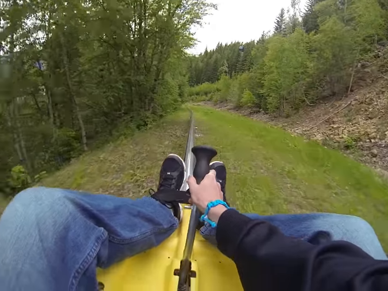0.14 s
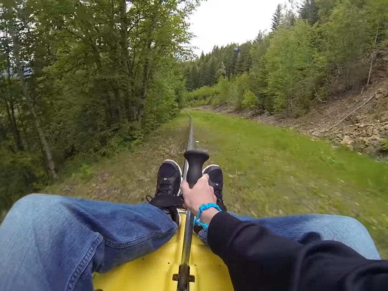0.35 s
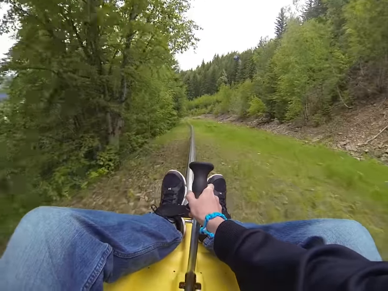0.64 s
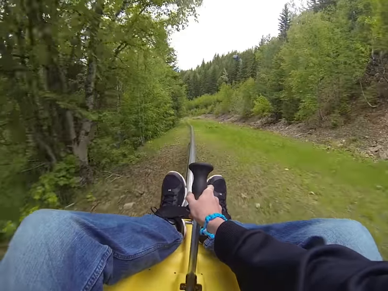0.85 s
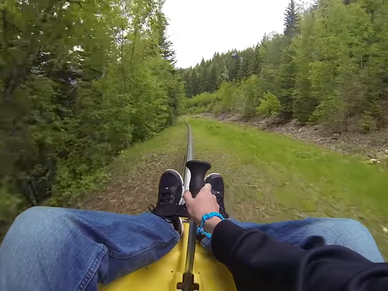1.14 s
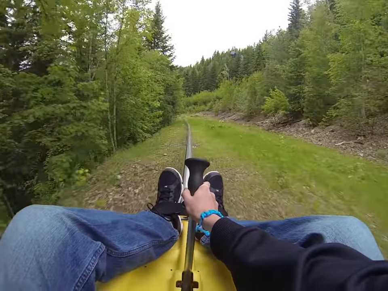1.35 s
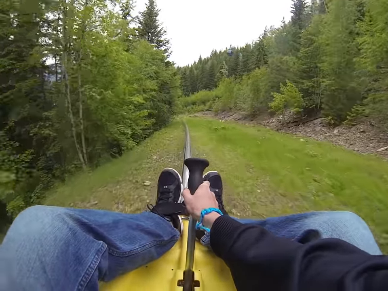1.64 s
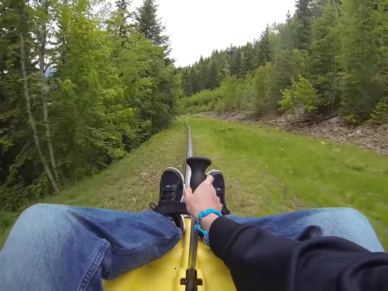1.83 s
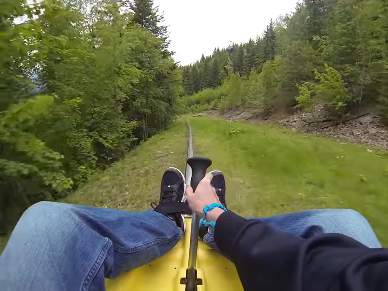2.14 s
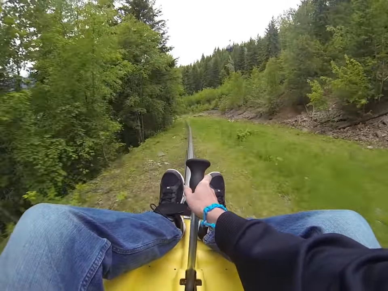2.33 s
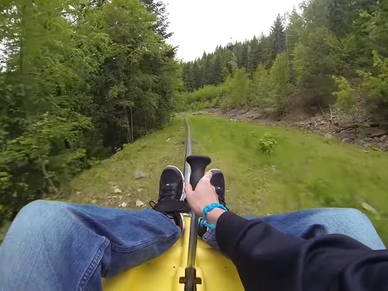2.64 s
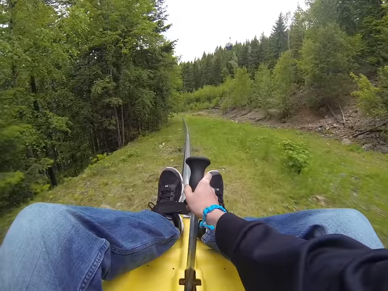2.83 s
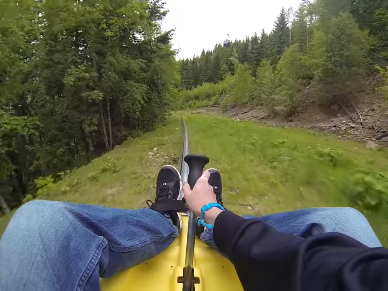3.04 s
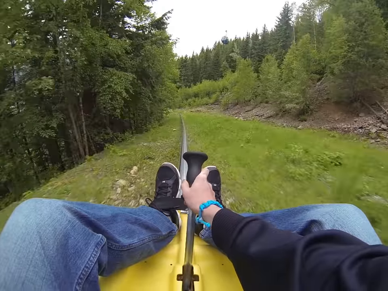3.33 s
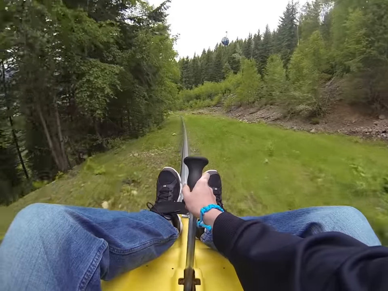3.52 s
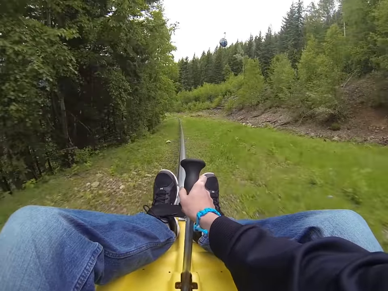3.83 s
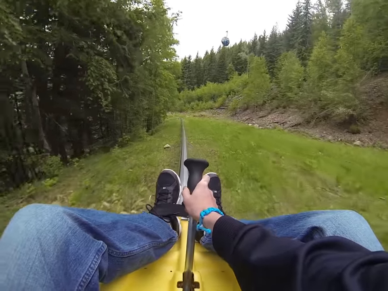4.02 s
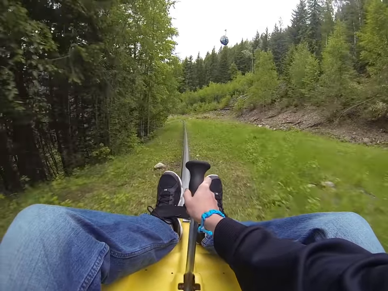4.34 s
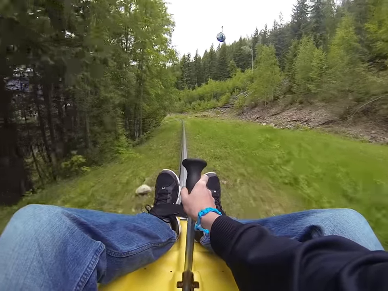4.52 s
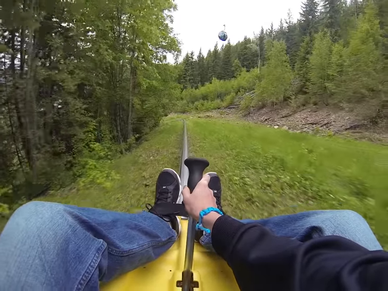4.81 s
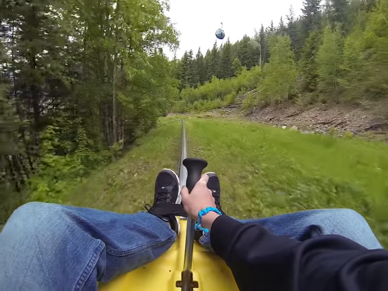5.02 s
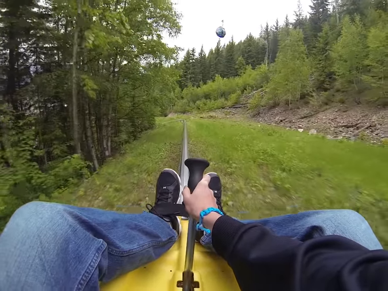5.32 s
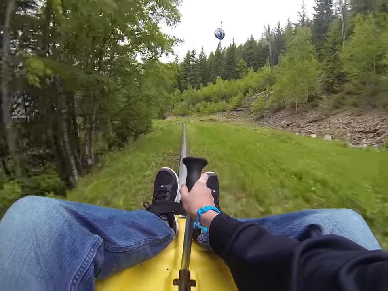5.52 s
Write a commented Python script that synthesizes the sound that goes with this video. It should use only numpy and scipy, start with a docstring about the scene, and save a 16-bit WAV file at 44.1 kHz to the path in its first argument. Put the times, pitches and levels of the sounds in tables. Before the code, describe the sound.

Heard close from the rider's chest, sled wheels hum and throb along a steel rail over a continuous low rumble of rolling and wind. Pipe joints give dull thumps, strongest right at the beginning, again past the middle and near the end. Small clacks from loose parts come irregularly throughout, joined later by short bursts of brake lever rattle. The plastic body resonates roughly, with a faint hiss behind it all.

```python
"""A sled rolls down a steel pipe on out-of-round wheels that hum and throb with every turn.
Their rough contact rumbles and rings the plastic shell, and pipe joints jolt the sled.
Bumps come through the seat, loose parts and the brake lever rattle, and the brake pad brushes the pipe.
Sway and wind push the microphone of a cased camera on the rider's chest.
Behind it all, the microphone hisses and the camera's electronics leak a faint pulsed whine."""
import sys
import numpy as np
from scipy import signal
from scipy.fft import rfft, irfft, next_fast_len
from scipy.io import wavfile
from scipy.ndimage import uniform_filter1d

SR = 44100
rng = np.random.default_rng(int(sys.argv[2]) if len(sys.argv) > 2 else 0)


def int16_out(signal):
    """Quantize to a 16-bit WAV file."""
    q = np.round(np.clip(np.atleast_2d(signal).T, -1, 1) * 32767)
    wavfile.write(sys.argv[1], SR, q.astype(np.int16))


N = 250047
T = np.arange(N) / SR
FFT_SIZE = next_fast_len(N)
FREQS = np.maximum(np.arange(FFT_SIZE // 2 + 1) * SR / FFT_SIZE, 1.)

# How fast the larger wheel spins (time [s], speed [turns/s])
WHEEL_SPEED = [(0, 26.82), (.5, 26.59), (1, 26.42), (1.5, 26.3), (2, 26.24), (3, 26.25), (4, 26.31),
               (5, 26.26), (5.67, 26.15)]
# Tones from the wheels' dents (pitch [multiple of wheel speed], larger wheel [dB], smaller wheel [dB])
WHEEL_TONES = [(2, -52, -59), (3.003, -55, -59.5), (4.003, -54.5, -55), (5.046, -54.5, -58.5),
               (5.96, -78, -61), (7.014, -60, -58.5), (8.005, -63.5, -66.5), (8.91, -64, -61),
               (10.01, -56, -55.5), (11.05, -81.5, -55.5), (11.97, -61, -62), (12.98, -63.5, -69.5),
               (14.22, -74, -81.5), (15.07, -58, -79), (16.06, -63.5, -73), (17.92, -69, -79),
               (18.91, -76, -67.5), (20.14, -72, -91), (21.05, -72.5, -78), (22.1, -66.5, -70.5),
               (22.92, -69, -73), (23.8, -71, -85), (26.1, -85, -88), (27.6, -77, -87), (29.37, -73, -85)]
# How hard the wheels throb (time [s], level [dB])
THROB_LEVEL = [(0, -29), (.25, -30), (.39, -21), (.52, -34), (.65, -25.5), (.95, -21.5), (1.3, -28.5),
               (1.55, -27), (1.7, -31), (2.15, -33), (2.32, -34.5), (2.8, -26), (3.3, -29), (3.47, -20),
               (3.6, -32.5), (3.71, -22), (3.85, -34), (4.18, -21), (4.45, -25.5), (4.74, -33),
               (4.87, -16.5), (5.22, -31), (5.37, -18), (5.45, -28), (5.51, -23), (5.67, -26)]
# Strength of the rumble and wind between jolts (time [s], level [dB])
RUMBLE_LEVEL = [(0.0, -37.5), (0.28, -41), (2.19, -40.5), (2.95, -41), (3.68, -41.5), (4.67, -40),
                (5.26, -41), (5.67, -40)]
# Tone of the rumble and wind (frequency [Hz], relative level [dB])
RUMBLE_TONE = [(26, -52), (45, -3), (58, -10.5), (97, -9.5), (274, -24), (365, -27), (398, -25.5),
               (525, -28.5), (765, -30.5), (900, -45.5), (1170, -50), (1980, -120)]
# The shell's and camera case's modes, or pitches they ring at (pitch [Hz], width [Hz], gain [dB])
SHELL_MODES = [(590, 370, -17), (958, 197, -8), (1262, 262, 4.5), (1497, 206, -3.5), (1737, 256, -4),
               (2219, 523, -5), (2963, 735, -10.5), (3794, 270, -23), (4120, 940, -19), (4800, 660, -36),
               (5160, 320, -21.5), (6350, 910, -39), (7730, 1050, -26.5), (9740, 670, -28.5)]
# Jolts from pipe joints and rough spots (time [s], shudder [dB], sway [dB], rolling noise boost [dB])
JOLTS = [(.01, -22.5, -21.5, 3.5), (0.144, -18.5, -18.5, 8), (.31, -44, -20.5, -0.5), (.80, -27.5, -35, 1),
         (.98, -38, -36, 0.5), (1.45, -45, -24.5, 3), (2.10, -37, -26.5, 3), (2.20, -52, -20.5, -1.5),
         (2.76, -36, -27, 2), (3.44, -29.5, -25, 3.5), (4.14, -26, -22, 4), (4.84, -30.5, -34, 2.5),
         (5.46, -27.5, -12.5, 0.5)]
# Dull bumps through the seat (time [s], strength [dB], pitch [Hz], fade length [swings])
SEAT_BUMPS = [(.084, -22.5, 269, 3.3), (.101, -25, 200, 1), (0.125, -13, 44, 3.1), (0.125, -17, 149, 0.51),
              (0.133, -21, 150, 0.45), (.153, -28, 292, 2), (0.189, -18, 52, 0.82),
              (0.194, -16.5, 138, 0.93), (0.1992, -16.5, 304, 0.53), (0.2094, -12.5, 260, 0.44),
              (0.2157, -18, 196, 0.33), (0.228, -21.5, 161, 0.81), (.255, -28, 119, 1.5),
              (1.426, -32, 173, 1.1), (1.537, -29, 133, 1), (1.546, -26, 238, 0.93),
              (2.091, -23.5, 280, 0.64), (2.766, -26.5, 264, 0.74), (2.861, -33, 227, 2.4),
              (3.178, -35, 140, 0.72), (3.2298, -21, 96, 0.62), (3.3916, -26, 193, 0.89),
              (3.443, -16, 126, 0.82), (3.502, -31, 296, 2.5), (4.046, -27.5, 390, 1.55),
              (4.138, -37, 198, 0.38), (4.157, -26, 292, 3), (5.435, -29, 110, 1.2), (5.469, -31, 130, 1.0),
              (5.478, -13, 30.2, 2.7), (5.509, -24, 232, 1.06), (5.5205, -26.5, 131, 1.0)]
# Loose parts hit the camera mount (time [s], peak [dB], middle boost [dB], treble boost [dB], pitch [Hz])
MOUNT_KNOCKS = [(0.0313, -37, 3, 11, 1290), (0.0677, -32.5, 3, 1, 1540), (0.0844, -33, 3, 7, 1260),
                (0.1714, -42, 4, 12, 1190), (0.198, -21, -12.5, -17, 1200), (0.209, -32, -13, -7, 1150),
                (0.512, -36, -1, -3, 1330), (0.6967, -37, -18, -15, 1410), (0.7854, -34.5, -4, -9, 1210),
                (1.2444, -43.5, 10, 21, 1290), (1.4344, -33.5, 1, 0, 1270), (1.5375, -35.5, -19, -10, 1330),
                (1.635, -42, 8, 17, 1270), (2.5072, -36.5, 10, 4, 1370), (2.654, -43, 20, 4, 1265),
                (2.721, -34.5, 6, 1, 1480), (2.756, -31, 4, 5, 1400), (2.8604, -37, 9, -1, 1250),
                (2.884, -36, 1, 4, 1340), (2.9986, -32.5, 2, -3, 1460), (3.0239, -29.5, 2, -6, 1260),
                (3.1792, -35, 0, -2, 1430), (3.2312, -23, -2.5, -2, 1250), (3.3931, -44, -4, -3, 1300),
                (3.444, -26, 7.5, 1, 1310), (3.503, -35, -8, -8, 1150), (4.0482, -41, 6, 11, 1500),
                (4.781, -35.5, 3, 5, 1320), (4.7855, -32.5, 1, 0, 1400), (4.871, -50, 0, 26, 1265),
                (5.001, -36, 4, 7, 1270), (5.436, -31, 11.5, 7, 1500), (5.47, -40, 11, 10, 1210),
                (5.5085, -26.5, 1.5, 4.5, 1330), (5.518, -33.5, 0, 4, 1420), (5.527, -40, -10, 0, 1250)]
# How the camera mount rings (pitch [Hz], width [Hz], gain [dB])
MOUNT_MODES = [(693, 400, -12), (1265, 193, 2.5), (1624, 255, -10.5), (2033, 320, -7), (2770, 430, -8),
               (3265, 270, -15), (3680, 270, -18), (4310, 370, -24.5), (5120, 740, -24.5),
               (6360, 470, -33.5), (7250, 860, -27), (9400, 600, -35)]
# The brake lever knocks (time [s], peak [dB], middle boost [dB], treble boost [dB], pitch [Hz])
LEVER_KNOCKS = [(2.0934, -34.5, 5, 8, 1340), (4.0976, -40, 7, 0, 1340), (4.1327, -28.5, -3, 1.5, 1400),
                (4.167, -30, 2.5, 10, 1310), (4.205, -28.5, 0, 5.5, 1320), (4.243, -35, 5, 12, 1330),
                (4.819, -31.5, 1, 0, 1370), (4.857, -29, -7, -3, 1340), (4.8932, -31, -11, -5, 1350)]
# How the lever rings (pitch [Hz], width [Hz], gain [dB])
LEVER_MODES = [(1340, 260, -7), (1770, 170, 1), (2066, 210, 1.5), (2330, 280, 2), (2870, 770, -9.5),
               (4140, 260, -11), (5000, 450, -24.5), (6170, 280, -25.5), (7060, 680, -24),
               (8160, 1100, -31), (11500, 2800, -34.5)]
# How a flaw in the wheel rings (pitch [Hz], width [Hz], gain [dB])
TICK_MODES = [(2250, 400, -2), (2750, 400, -1), (3250, 450, 0), (3850, 400, -10), (4420, 380, -3),
              (5050, 400, -10), (6100, 1100, -14)]
# The brake pad brushes the pipe (time [s], level [dB], rise [s], fall [s])
PAD_BRUSHES = [(.1, -74, .11, .11), (1.43, -65, .1, 0.19), (2.8, -79, 0.22, .2)]
# How the pad rings (pitch [Hz], width [Hz], gain [dB])
PAD_MODES = [(3730, 430, -6.5), (4950, 210, -3), (6360, 300, -15), (7130, 410, -16)]
# Tone of the microphone hiss (frequency [Hz], relative level [dB])
HISS_TONE = [(500, 19.5), (3000, -9), (6000, 6), (11000, 4), (14000, 3.5), (15200, -7)]

SMALL_WHEEL_RATIO = 1.0049  # the smaller wheel spins this many times as fast


def wheel_hum(turns):
    """Dents come round every turn and make tones; two wheels of nearly one size beat slowly together."""
    hum = np.zeros(N)
    for wheel, ratio in enumerate((1, SMALL_WHEEL_RATIO)):
        slipped = ratio * turns + .004 * wander(3.03)  # the wheel slips a little on the pipe
        for multiple, *levels_db in WHEEL_TONES:
            gain = from_db(levels_db[wheel] + 1.7 * wander(3.004))  # wavers with the load
            hum += gain * np.sqrt(2) * np.sin(2 * np.pi * (multiple * slipped + rng.random()))
    return hum


def wheel_throb(turns):
    """Each out-of-round wheel pushes the sled once a turn, the smaller one half as hard."""
    wobble = .62 * wander(3.6)
    large = np.sin(2 * np.pi * (turns - .42) + wobble)
    small = np.sin(2 * np.pi * (SMALL_WHEEL_RATIO * turns - .78) + wobble)
    return from_db(curve(THROB_LEVEL) + 2.56 * wander(7)) * normalize(large + .5 * small)


def rumble(boost_db):
    """Rolling and wind make a deep noise that takes a share of each jolt's boost."""
    rough = noise() * from_db(.94 * wander(24.98))
    return from_db(curve(RUMBLE_LEVEL) + .35 * boost_db) * normalize(shape_tone(rough, RUMBLE_TONE))


def shell_ring(boost_db, start_db=-52, fade_db_per_s=.39):
    """The gritty contact of wheel on pipe rings the plastic shell and the camera case."""
    grit = noise() * from_db(1.7 * wander(150))
    ringing = ring_modes(grit, SHELL_MODES, flicker_db=.93)
    return from_db(start_db - fade_db_per_s * T + boost_db) * ringing


def rider_sway(lag_s=.074):
    """Sled and rider sway against the microphone, more after a jolt, which the body answers late."""
    gain = from_db(-33.5 + 2.1 * wander(5.4))
    gain += sum(from_db(db) * swell(s + lag_s, rise_s=.06, fall_s=.074) for s, _, db, _ in JOLTS)
    motion = even_out(ring(noise(), hz=13, width=16))
    return gain * normalize(ring(motion, hz=12, width=30))


def case_shudder():
    """The camera case shakes with a low flutter that jumps at each jolt."""
    gain = from_db(-39 + .96 * wander(5.2))
    gain += sum(from_db(db) * swell(s, rise_s=.025, fall_s=.072) for s, db, _, _ in JOLTS)
    return gain * even_out(ring(noise(), hz=38.6, width=27.1))


def seat_bumps(size=16384):
    """Each bump through the seat is a few swings that die quickly, inward first."""
    out = np.zeros(N + size)
    for s, db, hz, swings in SEAT_BUMPS:
        cycles = np.arange(size) / SR * hz
        rise = 1 - np.exp(-(cycles / .17) ** 2)
        fade = np.exp(-cycles / swings)
        start = int(s * SR)
        out[start:start + size] -= from_db(db) * np.sin(2 * np.pi * cycles) * rise * fade
    return out[:N]


def knocks(events, modes, skitter_s, blow, size=4096):
    """A part lands one clean blow, then skitters; harder contact boosts the higher modes."""
    out = np.zeros(N + size)
    t = np.arange(size) / SR
    freqs = np.maximum(np.arange(size // 2 + 1) * SR / size, 1.)
    for s, db, middle_db, treble_db, pitch_hz in events:
        contact = rng.standard_normal(size) * np.exp(-t / skitter_s) * np.minimum(t / .00087, 1)
        contact[0] += blow
        boosts_db = (0, middle_db, middle_db, treble_db, treble_db - 4)
        response = 0
        for k, (hz, width, gain_db) in enumerate(modes):
            if 1000 < hz < 1400:  # the main low mode shifts with the spot struck
                hz = pitch_hz
            boost_db = np.interp(hz, (1500, 2300, 3500, 5200, 7000), boosts_db)
            response += (-1) ** k * from_db(gain_db + boost_db) * resonance(freqs, hz, width)
        knock = irfft(rfft(contact) * response, size)
        start = int(s * SR)
        out[start:start + size] += from_db(db) * knock / np.abs(knock).max()
    return out[:N]


def loose_parts(faint_per_s=2.2):
    """Loose parts knock on the camera mount, with fainter knocks at random times in between."""
    gap, softness, middle, treble, pitch = rng.random((40, 5)).T
    times = np.cumsum(-np.log(gap) / faint_per_s)
    faint = np.transpose([times, -40.5 - 12 * softness, 20 * middle - 8, 8 * treble - 3,
                          1200 + 300 * pitch])
    return knocks([*MOUNT_KNOCKS, *faint[times < T[-1]]], MOUNT_MODES, skitter_s=.0028, blow=10.6)


def brake_lever():
    """The brake lever chatters, at times once a wheel turn."""
    return knocks(LEVER_KNOCKS, LEVER_MODES, skitter_s=.0049, blow=9.3)


def wheel_tick(turns, lag_turns=.02):
    """A flaw in the wheel strikes softly once a turn and grates for a moment."""
    flaw_turns = turns - lag_turns
    strike = np.diff(np.floor(flaw_turns), prepend=-1)
    grating = .11 * noise() * np.exp(-(flaw_turns % 1) / .06)
    return from_db(-70 + 2.2 * wander(12)) * ring_modes(strike + grating, TICK_MODES, flicker_db=1)


def brake_pad():
    """The pad scrapes very faintly all along and rings louder when it brushes the pipe."""
    gain = from_db(-80) + sum(from_db(db) * swell(s, rise, fall) for s, db, rise, fall in PAD_BRUSHES)
    friction = noise() * from_db(2 * wander(60))
    return gain * ring_modes(friction, PAD_MODES, flicker_db=.4)


def camera_whine(pitch_hz=12904, bursts_per_s=47.97, on_share=.385):
    """The electronics leak a high tone in bursts; each flips the wave over and shifts it at random."""
    cycle = T * bursts_per_s + .08
    burst = cycle.astype(int)
    gate = uniform_filter1d(1. * (cycle % 1 < on_share), size=40)
    phase = np.pi * burst + 1.1 * rng.standard_normal(burst[-1] + 1)[burst]
    return from_db(-68 + .74 * wander(40)) * gate * np.sin(2 * np.pi * pitch_hz * T + phase)


def microphone_hiss():
    """The microphone adds a quiet, slightly grainy hiss."""
    grainy = noise() * from_db(2 * wander(200))
    return from_db(-67.5) * normalize(shape_tone(grainy, HISS_TONE))


def from_db(db):
    """Turn decibels into a number to multiply by."""
    return 10 ** (np.asarray(db) / 20)


def normalize(x):
    """Scale a signal to an average (RMS) strength of 1."""
    return x / np.sqrt(np.mean(x ** 2))


def noise():
    """White noise: all frequencies equally strong."""
    return rng.standard_normal(N)


def wander(per_s):
    """A smooth random drift of size about 1, with per_s new values a second."""
    hold = int(SR / per_s)
    steps = np.repeat(rng.standard_normal(N // hold + 1), hold)
    return normalize(uniform_filter1d(uniform_filter1d(steps, hold), hold)[:N])


def curve(table):
    """Join (time, value) points with straight lines."""
    return np.interp(T, *np.transpose(table))


def swell(s, rise_s, fall_s):
    """Rise softly to 1 at time s, then die away."""
    return np.where(T < s, np.exp(-((T - s) / rise_s) ** 2), np.exp(-np.abs(T - s) / fall_s))


def even_out(x):
    """Smooth away most of the chance swells in a narrow band of noise."""
    envelope = np.abs(signal.hilbert(normalize(x), FFT_SIZE)[:N])
    return normalize(x / (envelope + .3) ** .6)


def apply_filter(x, response):
    """Multiply each frequency in a signal by its own gain."""
    return irfft(rfft(np.resize(x, FFT_SIZE)) * response, FFT_SIZE)[:N]


def shape_tone(x, points):
    """Filter a signal along a line of (frequency, level) points."""
    hz, db = np.transpose(points)
    return apply_filter(x, from_db(np.interp(np.log(FREQS), np.log(hz), db)))


def resonance(freqs, hz, width):
    """A steep filter curve that passes hz fully and weakens frequencies on either side."""
    return (1 / (1 + 1j * (freqs ** 2 - hz ** 2) / (freqs * width))) ** 2


def ring(x, hz, width):
    """Let a signal ring one resonance."""
    return apply_filter(x, resonance(FREQS, hz, width))


def ring_modes(x, modes, flicker_db):
    """Ring an object's modes, alternating in sign and each flickering; the sum has strength 1."""
    return normalize(sum((-1) ** k * from_db(db + flicker_db * wander(14)) * ring(x, hz, width)
                         for k, (hz, width, db) in enumerate(modes)))


def scene():
    """Add the wheels, shaking, brake and camera sounds into one channel."""
    turns = np.cumsum(curve(WHEEL_SPEED)) / SR
    boost_db = sum(db * swell(s, rise_s=.084, fall_s=.15) for s, _, _, db in JOLTS)
    wheels = wheel_hum(turns) + wheel_throb(turns) + wheel_tick(turns)
    rolling = rumble(boost_db) + shell_ring(boost_db)
    shaking = rider_sway() + case_shudder() + seat_bumps() + loose_parts()
    brake = brake_lever() + brake_pad()
    camera = camera_whine() + microphone_hiss()
    return (wheels + rolling + shaking + brake + camera)[None]


def record(dry, cutoff_hz=15100):
    """Cut off the highest treble."""
    return signal.sosfilt(signal.ellip(8, .2, 60, cutoff_hz, fs=SR, output="sos"), dry)


dry = scene()
out = record(dry)
int16_out(out)
```